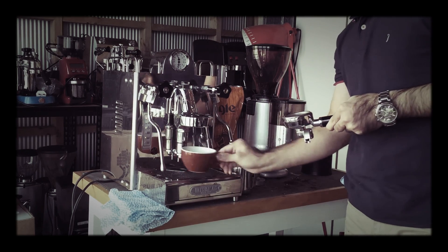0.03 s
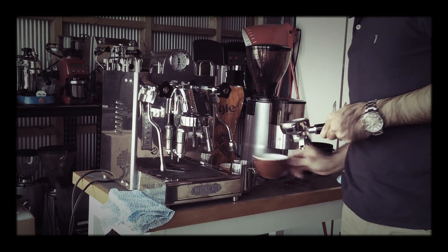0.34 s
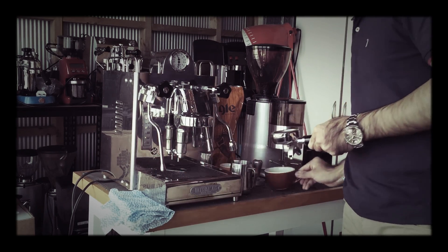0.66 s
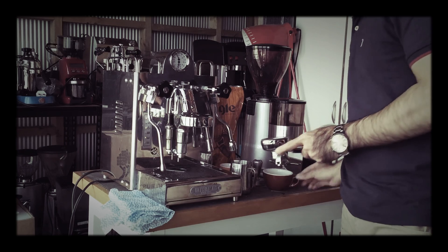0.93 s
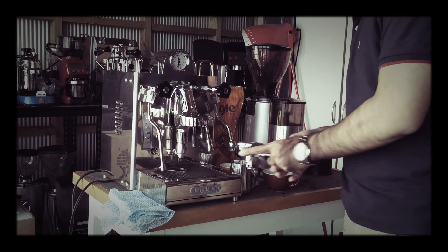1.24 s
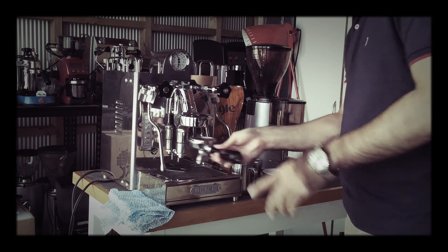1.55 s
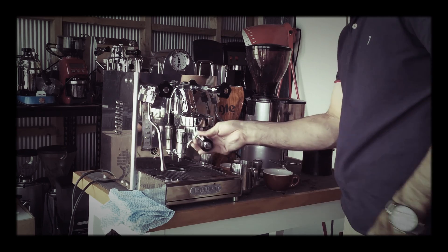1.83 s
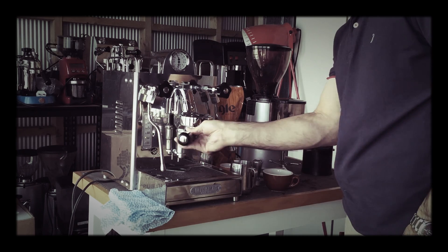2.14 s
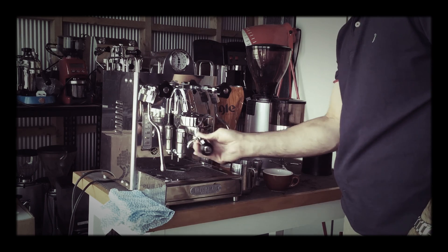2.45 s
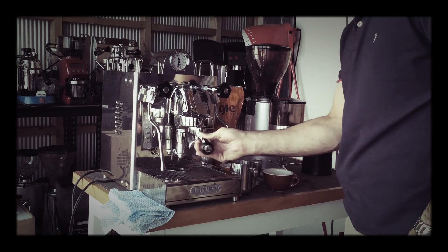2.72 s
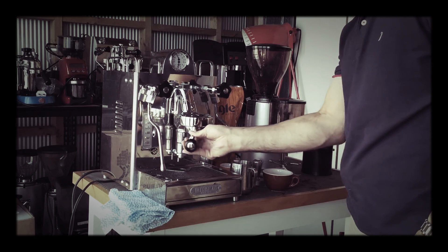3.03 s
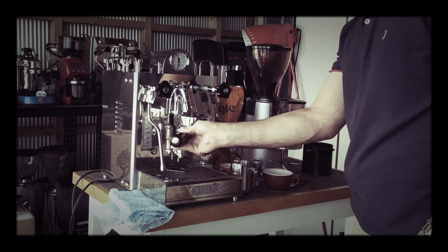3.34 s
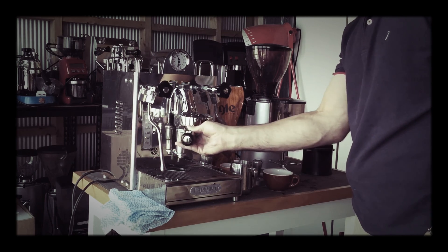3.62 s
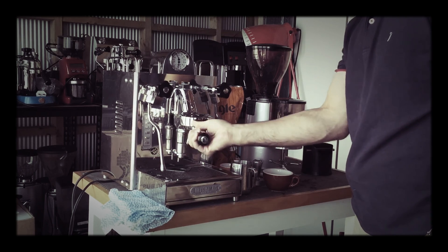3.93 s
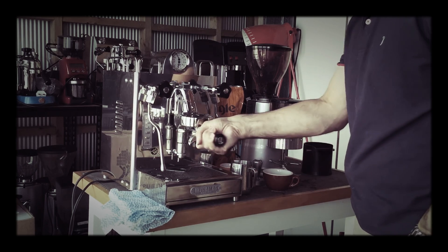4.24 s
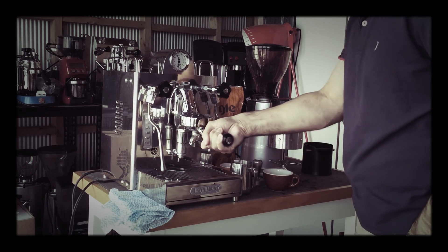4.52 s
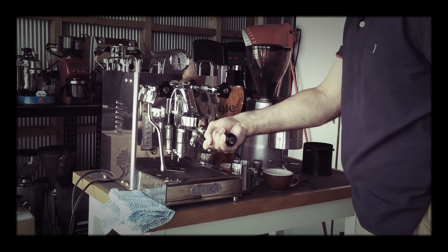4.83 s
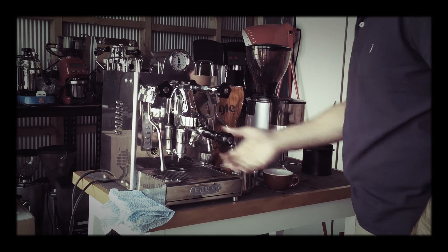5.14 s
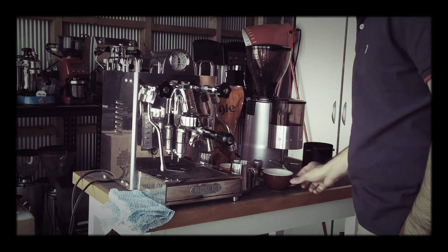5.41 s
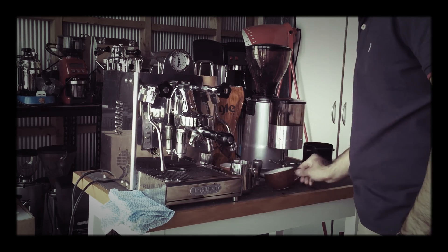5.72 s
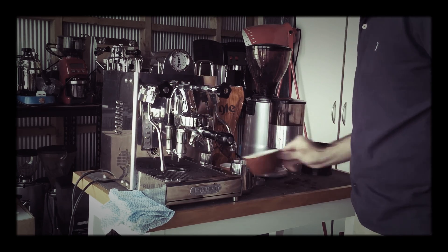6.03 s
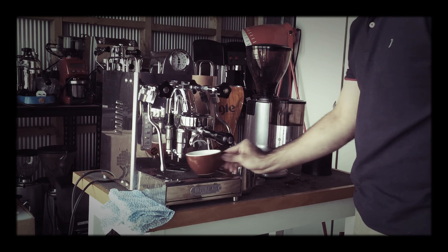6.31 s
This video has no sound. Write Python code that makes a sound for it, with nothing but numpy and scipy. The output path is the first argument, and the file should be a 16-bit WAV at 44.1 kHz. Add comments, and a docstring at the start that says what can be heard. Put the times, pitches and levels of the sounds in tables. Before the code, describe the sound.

A cup knocks down, a steel portafilter clanks into an espresso machine, then a pump briefly buzzes with hissing water.

```python
"""A small hard room with an espresso machine, a low drone behind it all.
A china cup knocks down on a wooden bench. A steel portafilter scrapes off a grinder, clanks
into the group head and grinds tight, its thin basket ringing. A valve snaps open, a vibrating
pump buzzes and pushes hissing water for about half a second, and the cup clinks as it is
picked up again, just before one soft, deep thud."""
import sys
import numpy as np
from scipy import signal
from scipy.fft import rfft, irfft
from scipy.io import wavfile

SR = 44100
rng = np.random.default_rng(int(sys.argv[2]) if len(sys.argv) > 2 else 0)


def transcribe(signal):
    """Save signal, clipped to [-1, 1], as a 16-bit WAV file at the path in sys.argv[1]."""
    frames = np.atleast_2d(signal).T
    limited = np.clip(frames, -1, 1)
    pcm = np.round(limited * 32767).astype(np.int16)
    wavfile.write(sys.argv[1], SR, pcm)


N = 280917
TIME = np.arange(N) / SR


def amp(db):
    """Decibels to gain."""
    return 10 ** (np.asarray(db) / 20)


def rms(x):
    """Root mean square."""
    return np.sqrt(np.mean(x ** 2) + 1e-24)


def add(mix, s, sound):
    """Lays a sound into the mix at time s."""
    part = mix[max(round(s * SR), 0):][:len(sound)]
    part += sound[:len(part)]


def band(x, edges):
    """Band-pass between two edges in Hz."""
    return signal.sosfilt(signal.butter(4, edges, "bandpass", fs=SR, output="sos"), x)


def emphasis(hz, peaks):
    """Boost in dB at hz from resonances given as (centre [Hz], width [Hz], boost [dB])."""
    return sum(boost / (1 + (2 * (hz - centre) / width) ** 2) for centre, width, boost in peaks)


def coloured(x, colour, peaks=()):
    """Shapes x with an EQ curve and resonances on top, at unit level."""
    hz = np.fft.rfftfreq(len(x), 1 / SR)
    curve_hz, curve_db = np.transpose(colour)
    eq_db = np.interp(np.log(hz + 1), np.log(curve_hz + 1), curve_db) + emphasis(hz, peaks)
    y = irfft(rfft(x) * amp(eq_db), len(x))
    return y / rms(y)


def gate(on, off, attack, release):
    """Envelope with a soft start, a hold and an exponential release, all in s."""
    fade_in = 1 - np.exp(-(np.maximum(TIME - on, 0) / attack) ** 2)
    return fade_in * np.exp(-np.maximum(TIME - off, 0) / release)


def wander(rate_hz):
    """Smooth random modulation of unit size."""
    rolloff = np.exp(-(np.fft.rfftfreq(N, 1 / SR) / rate_hz) ** 2)
    y = irfft(rfft(rng.standard_normal(N)) * rolloff, N)
    return y / rms(y)


def grit(count, spread_db):
    """Grainy noise made of tiny contacts of uneven size."""
    y = rng.standard_normal(count) * amp(spread_db * np.clip(rng.standard_normal(count), -2, 2))
    return y / rms(y)


# bass, middle, treble and top bands: (low edge [Hz], high edge [Hz])
BANDS = [(110, 700), (700, 2500), (2500, 7000), (7000, 17000)]
# reverb decay in each band: (t60 [s])
ROOM_T60 = [0.35, 0.31, 0.29, 0.17]


def room(x, wet_db):
    """Adds the diffuse tail of the small room; the highs die first."""
    t = TIME[:SR // 2]
    tail = sum(band(rng.standard_normal(len(t)), edges) * amp(-60 * t / t60)
               for edges, t60 in zip(BANDS, ROOM_T60))
    wet = signal.fftconvolve(x, tail / np.linalg.norm(tail))[:N]
    return (x + amp(wet_db) * wet) / np.hypot(1, amp(wet_db))


def drone(fader, hz, throb_db, rough):
    """A far low tone that wavers unevenly while it rides a fader curve."""
    throb = amp(throb_db * np.tanh(wander(6.8)))
    flutter = 1 + rough * (wander(19) + 1j * wander(20))  # in level and phase
    tone = (throb * flutter * np.exp(2j * np.pi * hz * TIME)).real
    fader_db = np.interp(TIME, *np.transpose(fader), left=-140, right=-140)
    return amp(fader_db) * tone / rms(tone)


# EQ of the room air and of the rumble: (frequency [Hz], relative level [dB])
AIR_EQ = [(30, -39), (53, -38), (90, -8.5), (114, -15.5), (180, -21.5), (210, -24), (244, -21),
          (330, -29.5), (2180, -36), (2710, -37), (9110, -44.5), (10400, -47), (15000, -46), (16000, -54)]
RUMBLE_EQ = [(25, -18), (36, -22), (43, -3), (52, -15.5), (68, 2), (83, -2.5), (95, -11), (125, -25),
             (250, -70)]
# drone faders; the high one sinks away, the low one swells late: (time [s], level [dB])
HIGH_DRONE_FADER = [(0, -49), (.7, -58), (1.3, -57), (1.9, -51), (2.6, -67), (3.25, -58.5), (3.9, -77.5),
                    (6.37, -70)]
LOW_DRONE_FADER = [(0, -80), (1.2, -78), (1.9, -65), (2.6, -73.5), (4.7, -71), (5.0, -59.5), (5.7, -55),
                   (6.37, -62.5)]


def background():
    """The bed: room air and an uneven rumble that beats against two drones."""
    air = amp(-66) * coloured(rng.standard_normal(N), AIR_EQ)
    rumble = amp(-66 + 1.6 * wander(5)) * coloured(rng.standard_normal(N), RUMBLE_EQ)
    high = drone(HIGH_DRONE_FADER, hz=75.7, throb_db=1.5, rough=0.29)
    low = drone(LOW_DRONE_FADER, hz=45.7, throb_db=0.0, rough=0.15)
    return air + rumble + high + low


def thud(peak_s=5.9, width_s=0.045, hz=46.7):
    """A soft, deep thud, perhaps a foot shifting on the floor."""
    swell = 1 / (1 + ((TIME - peak_s) / width_s) ** 2)
    rumble = amp(-7) * coloured(rng.standard_normal(N), RUMBLE_EQ)
    return amp(-43.5) * swell * (np.sin(2 * np.pi * hz * TIME) + rumble)


def ring(modes, t, scatter_db=2):
    """Dying modes; each hit excites them a little differently."""
    return sum(amp(db + scatter_db * rng.standard_normal() - 60 * t / t60)
               * np.sin(2 * np.pi * (hz * t + rng.random())) for hz, db, t60 in modes)


# light touches of china and small metal parts: (time [s], pitch [Hz], level [dB], t60 [s])
TINKS = [(0.0, 2290, -74, 0.44), (0.042, 4100, -60.5, 0.07), (1.522, 1650, -60, 0.16),
         (1.522, 1940, -59.5, 0.088), (1.654, 2320, -47, 0.16), (1.655, 2550, -66, 0.3),
         (2.259, 530, -46.5, 0.099), (3.732, 3440, -58, 0.071), (4.315, 2600, -60, 0.051),
         (4.438, 2080, -63, 0.14), (5.149, 4050, -41.5, 0.13), (5.611, 3396, -54, 0.17),
         (5.609, 2690, -54.5, 0.35), (5.649, 2960, -60, 0.22), (5.731, 2950, -59, 0.38),
         (5.726, 2055, -46, 0.24), (6.092, 2100, -60.5, 0.1)]


def tinks():
    """Each light touch rings one mode, with a little scuff that the room keeps briefly."""
    out, t = np.zeros(N), TIME[:SR // 2]
    for s, hz, db, t60 in TINKS:
        scuff = band(rng.standard_normal(len(t)), (0.87 * hz, 1.185 * hz))
        scuff = amp(db - 11 - 60 * t / min(t60, 0.18)) * scuff / rms(scuff)
        tone = ring([(hz, db, t60)], t, scatter_db=3.5) * (1 + 0.44 * wander(70)[:len(t)])
        attack = 1 - np.exp(-t / 0.0019)
        add(out, s, (tone + scuff) * attack)
    return out


# how long a struck body takes to speak in each band: (added rise [s])
BUILD_UP = [0.00022, 0.0023, 0.00028, 0.00034]


def impact(hit, colour, modes, modes_db, spot_db, crack_db, crack_t60):
    """One hit: a short crack, the object's modes, and dense clatter dying with the room."""
    rise, knock_hz, clink_hz, *levels_db = hit
    t = TIME[:SR]
    # the struck spot favours two regions, a knock and a clink
    spot = [(knock_hz, 170, spot_db), (clink_hz, 0.089 * clink_hz, spot_db + 1.0)]
    clatter = coloured(grit(len(t), 4.7), colour, spot)
    excited = [(hz, db + 0.82 * emphasis(hz, spot), t60) for hz, db, t60 in modes]
    tone = amp(modes_db) * ring(excited, t, scatter_db=3.5)
    crack = amp(crack_db - 60 * t / crack_t60)
    out = np.zeros(len(t))
    for edges, db, t60, lag in zip(BANDS, levels_db, ROOM_T60, BUILD_UP):
        attack = 1 - np.exp(-t / (rise + lag))  # soft touches and heavy panels build up slowly
        decay = crack + amp(-60 * t / t60)
        part = band(attack * (clatter * decay + tone), edges)
        out += amp(db) * part / rms(part[:SR // 40])  # the first 25 ms set the level
    return out


# switch and valve clicks: (time [s], rise [s], knock [Hz], clink [Hz],
# bass [dB], middle [dB], treble [dB], top [dB], relative snap [dB])
SWITCH_CLICKS = [(4.198, 0.000045, 1570, 6650, -101, -69, -77, -56.5, 16),
                 (4.314, 0.0011, 450, 2510, -95, -73, -76, -91, 27),
                 (4.722, 0.00055, 1150, 4230, -50, -51.5, -47, -50.5, 3),
                 (5.146, 0.00064, 1300, 4000, -55, -55, -56.5, -55, -11)]
# EQ of the clicks: (frequency [Hz], relative level [dB])
VALVE_EQ = [(120, -39), (550, -11.5), (1300, 21), (3300, 17), (4300, 15.5), (5200, -3.5), (8800, -15.5),
            (10400, -25), (12000, -15.5), (16000, -19)]
# ring of the valve: (pitch [Hz], relative level [dB], t60 [s])
VALVE_MODES = [(1090, -2, 0.63), (1350, -3, 0.66), (4020, -10, 0.21), (4140, -14, .22), (4750, -21, .18)]


def switches():
    """Switches and the valve make small, crisp snaps inside the machine."""
    out = np.zeros(N)
    for s, *hit, snap_db in SWITCH_CLICKS:
        add(out, s, impact(hit, VALVE_EQ, VALVE_MODES,
                           modes_db=-13.0, spot_db=0.5, crack_db=snap_db, crack_t60=0.0081))
    return out


# EQ of the rushing water: (frequency [Hz], relative level [dB])
WATER_EQ = [(71, -47), (120, -55), (192, -12.5), (231, -18), (321, -19), (385, -11.5), (427, -12.5),
            (546, -8), (670, -15), (1340, -14), (1830, -18), (1980, -21), (2200, -19.5), (8480, -11.5),
            (16000, -24)]
# resonances of the casing: (centre [Hz], width [Hz], boost [dB])
CASING_PEAKS = [(196.8, 15.6, 14), (540, 59, 2), (1266, 24, 3.5), (1998, 54, 12)]
# pump harmonics that the casing sings with: (harmonic [number], relative level [dB])
PUMP_HARMONICS = [(3, -15), (4, -4), (8, -8), (10, -22), (11, -0.5), (20, -15), (22, -11.5), (26, -26),
                  (40, -34)]


def pump(mains_hz=50, on_s=4.722, off_s=5.135, release_s=0.021):
    """A piston strokes once each mains cycle: it shakes the casing and drives spurts of water."""
    cycles = mains_hz * TIME
    push = np.exp(-(cycles % 1) / 0.18)
    recoil = 0.4 * np.exp(-((cycles + 0.5) % 1) / 0.15)
    rush = coloured(grit(N, 3.5) * (0.65 + push + recoil), WATER_EQ, CASING_PEAKS)
    knocking, hiss = band(rush, (110, 2800)), band(rush, (2800, 17000))
    hum = sum(amp(db + 5.3 * wander(1.95)) * np.sqrt(2) * np.sin(2 * np.pi * (k * cycles + rng.random()))
              for k, db in PUMP_HARMONICS)
    # the knocking builds with the pressure; the hiss starts as soon as the valve opens
    pressure = amp(-41) * gate(on_s, off_s, attack=0.047, release=release_s)
    flow = amp(-55 + 2.0 * wander(9.3)) * gate(on_s, off_s, attack=0.008, release=release_s)
    water = amp(-3.0) * pressure * knocking / rms(knocking) + flow * hiss / rms(hiss)
    return room(water, wet_db=-5.0) + amp(-8.5) * pressure * hum


# cup down, then up, before the trim: (time [s], rise [s], knock [Hz], clink [Hz],
# bass [dB], middle [dB], treble [dB], top [dB])
CUP_HITS = [(0.7933, 0.00008, 1000, 2740, -38, -28.5, -40, -70),
            (5.62, 0.0056, 1370, 3380, -54, -54, -61, -85), (5.684, 0.0087, 910, 2980, -58, -60, -85, -90),
            (5.724, 0.0012, 1850, 2930, -80, -54.5, -55, -80)]
# EQ of china on wood: (frequency [Hz], relative level [dB])
CUP_EQ = [(70, -28), (120, -12), (220, -4.5), (400, -12), (530, -7.5), (700, -10.5), (900, 2), (1140, 2),
          (1350, 1.5), (1800, 3), (2300, -15.5), (3400, -30.5), (4300, -30.5), (5100, -52), (6800, -46.5),
          (8000, -53), (16000, -50)]
# ring of the cup: (pitch [Hz], relative level [dB], t60 [s])
CUP_MODES = [(544, -6, 0.2), (846, -20, 0.17), (900, -3.5, 0.36), (970, -2, 0.26), (1262, 11, 0.059),
             (1370, -28, .22), (1390, 9, 0.11), (1470, -26, 0.12), (1610, -7.5, 0.2), (1750, -6, 0.34),
             (1810, -8, 0.16), (1876, 0.5, 0.3), (2720, -43, 0.27), (3460, -26, 0.27), (14500, -40, .5)]


def cup(trim_db=0.4):
    """Thick china meets the wooden bench: dull and short."""
    out = np.zeros(N)
    for s, *hit in CUP_HITS:
        add(out, s, impact(hit, CUP_EQ, CUP_MODES,
                           modes_db=-7, spot_db=3, crack_db=-2.0, crack_t60=0.039))
    return amp(trim_db) * out


# EQ of the scrape: (frequency [Hz], relative level [dB])
SLIDE_EQ = [(71, -53), (120, -16.5), (251, -6), (289, -8), (473, -12), (643, -10.5), (822, -6),
            (1090, -2.5), (1520, -14), (2020, -6), (2810, -17), (3240, -16.5), (4980, -26.5), (5630, -26.5),
            (16000, -37.5)]


def slide(start_s=0.935, peak_s=0.98, rise_db_per_s=380, fall_db_per_s=402):
    """The portafilter scrapes off its rest, metal on metal: it speeds up, then lifts clear."""
    rubbing = coloured(grit(N, 6.1) * amp(1.1 * wander(210)), SLIDE_EQ)
    from_peak = TIME - peak_s
    stroke = amp(-33 + np.minimum(rise_db_per_s * from_peak, -fall_db_per_s * from_peak))
    fade_in = np.clip((TIME - start_s) / 0.0073, 0, 1)
    return room(rubbing * stroke * fade_in, wet_db=-7.0)


# contour of the basket's high modes: (frequency [Hz], relative level [dB])
SHIMMER_EQ = [(4500, -4), (6300, -2.5), (7500, -8), (9000, 1.5), (9800, -3), (10400, -7), (11200, -2.5),
              (13300, -3), (15500, -5)]


def shimmer(count=110, t60=1.25):
    """The sheen of the thin steel basket: many close, beating modes."""
    t = TIME[:3 * SR // 2]
    pitches = rng.uniform(SHIMMER_EQ[0][0], SHIMMER_EQ[-1][0], count)
    modes = [(hz, np.interp(hz, *np.transpose(SHIMMER_EQ)), t60) for hz in pitches]
    sway = 1 + 0.27 * wander(25)[:len(t)]  # the ring swells and fades as the hand moves
    return ring(modes, t) * sway / np.sqrt(count)


# clanks on the group head: (time [s], rise [s], knock [Hz], clink [Hz],
# bass [dB], middle [dB], treble [dB], top [dB], relative free ring [dB])
STEEL_HITS = [(1.837, 0.00059, 1340, 2480, -34, -31, -38, -43.5, 5),
              (1.939, 0.0009, 1450, 3230, -43.5, -35, -49, -64, -14),
              (2.134, 0.0042, 1390, 2360, -64, -62, -68, -70, -4),
              (2.255, 0.003, 517, 6830, -63, -68.5, -81, -74, -6),
              (2.39, 0.002, 480, 2600, -66, -72, -82, -87, -18),
              (2.419, 0.0026, 520, 2620, -57.5, -62.0, -67.5, -77, -22),
              (2.519, 0.001, 2000, 2550, -54.5, -55, -61.5, -77, -10),
              (2.581, 0.001, 1970, 2350, -65, -55.5, -65.5, -80, -1),
              (2.808, 0.0007, 1560, 4560, -50.5, -49.5, -57, -66.5, -15),
              (2.857, 0.004, 440, 2750, -45.5, -57, -62, -74, -7),
              (2.893, 0.0014, 1400, 2740, -40.5, -40.5, -49, -59.5, -25.5),
              (2.926, 0.001, 1590, 4200, -43.5, -44.5, -56, -62.5, -11.5),
              (3.3464, 0.0011, 1410, 2400, -44.5, -32.5, -41, -60.5, -23),
              (3.38, 0.00018, 1460, 6000, -38, -31.5, -31, -48.5, -13.5),
              (3.39, 0.001, 1450, 4140, -38, -31.5, -36, -47.5, -29),
              (3.441, 0.0013, 2020, 4430, -48, -37, -62, -80, -20),
              (3.607, 0.0023, 785, 2750, -50.5, -50.5, -77, -76, -5.0),
              (3.744, 0.0022, 1440, 4150, -61, -44.5, -60, -91, -2),
              (3.773, 0.0016, 1370, 2620, -60, -75, -85, -92, -2),
              (3.836, 0.0023, 1750, 2460, -94, -60, -65.0, -78, -6)]
# EQ of steel on steel: (frequency [Hz], relative level [dB])
STEEL_EQ = [(100, -24.5), (160, 3), (230, 6.5), (280, -3.5), (330, 2.5), (540, 6.5), (850, -1.5),
            (1450, 6.5), (2300, 0.5), (3700, -4), (4450, -1.5), (5050, -11), (6100, -12), (7500, -16.5),
            (9500, -14), (10500, -22), (12000, -14), (16000, -22.5)]
# ring of the body and of the free-hanging basket: (pitch [Hz], relative level [dB], free t60 [s])
STEEL_MODES = [(162, -8, .5), (196, -14, .55), (280, -12, .45), (505, -8, .45), (550, -7, .45),
               (632, -9, .4), (700, -11, .4), (925, -13, .35), (1189, -9, .4), (1400, -1.5, .46),
               (1443, -9, .38), (1493, -6, .28), (1990, -10, .45), (2008, -7, .36), (2051, -11, .33),
               (2413, -11, .3), (2536, -16, .3), (3021, -12, .25), (3235, -17, .3), (4176, -14, .27),
               (4344, -13, .25), (4450, -17, .3), (5950, -20, .33), (6324, -18, .28)]
BASKET_MODES = [(1403, 10, 0.33), (2027, -0.5, 2.1), (2013, -5, 1.2), (2050, -5.5, 2.6)]
# damping of the body as it is twisted tight: (time [s], share of t60 left [ratio])
GRIP = [(1.8, 0.88), (2.4, 0.95), (3.7, 0.8)]


def portafilter():
    """Steel lugs clank into the group head; the basket rings on, and clamping damps the body."""
    out, basket, sheen = np.zeros(N), np.zeros(N), shimmer()
    for s, *hit, free_db in STEEL_HITS:
        middle_db, _, top_db = hit[-3:]
        t60_share = np.interp(s, *np.transpose(GRIP))
        damped = [(hz, db, t60 * t60_share) for hz, db, t60 in STEEL_MODES]
        add(out, s, impact(hit, STEEL_EQ, damped,
                           modes_db=-7.5, spot_db=6.5, crack_db=6.0, crack_t60=0.031))
        add(basket, s, amp(middle_db + free_db - 33.5) * ring(BASKET_MODES, TIME[:2 * SR]))
        add(out, s, amp(top_db + free_db - 10.5) * sheen)  # hard, bright hits wake the high modes
    return out + basket * amp(2.5 * wander(25))  # the ring wavers in the moving hand


# twists of the portafilter's handle: (start [s], length [s], end level [dB])
TWISTS = [(1.821, 0.09, -45.5), (2.2, 0.038, -65), (2.535, .1, -67), (2.808, 0.14, -52.5),
          (3.327, 0.18, -50), (3.55, 0.21, -61)]


def twists(build_db=5):
    """The lugs catch and slip along their groove; friction grows as they wedge in, then lets go."""
    grind = grit(N, 26) * amp(2.8 * wander(70))
    body = [(hz, 90, 6.5 + db / 3) for hz, db, _ in STEEL_MODES]  # the same modes colour the rubbing
    friction = np.zeros(N)
    for s, length, db in TWISTS:
        to_go = np.clip(1 - (TIME - s) / length, 0, 1)
        friction += amp(db - build_db * to_go) * gate(s, s + length, attack=0.0065, release=0.013)
    return room(coloured(grind, STEEL_EQ, body) * friction, wet_db=2.5)


def scene():
    """The mono mix: everything at the bench, over the bed."""
    foley = cup() + portafilter() + twists() + switches() + tinks() + slide()
    return (foley + pump() + thud() + background())[None]


def record(dry):
    """A steep low-pass takes off the very top."""
    lowpass = signal.firwin(511, cutoff=15950, window=("kaiser", 9), fs=SR)
    return signal.oaconvolve(dry, lowpass[None], "same")


dry = scene()
out = record(dry)
transcribe(out)
```